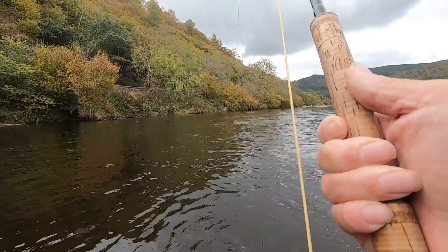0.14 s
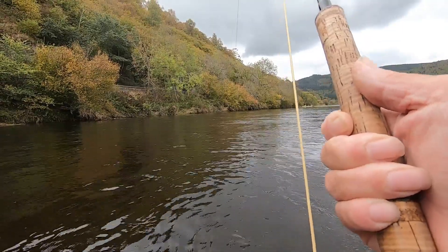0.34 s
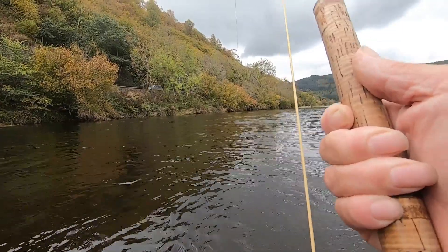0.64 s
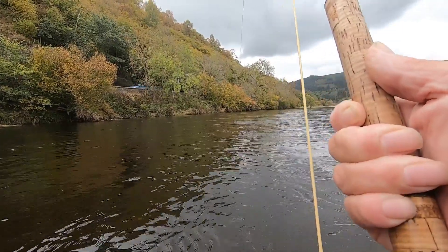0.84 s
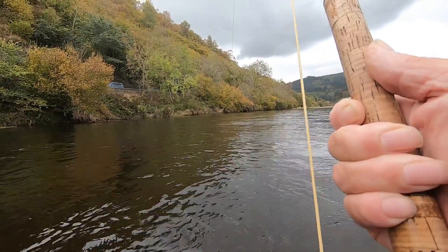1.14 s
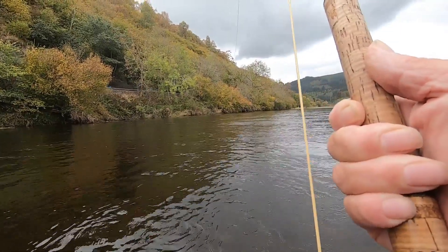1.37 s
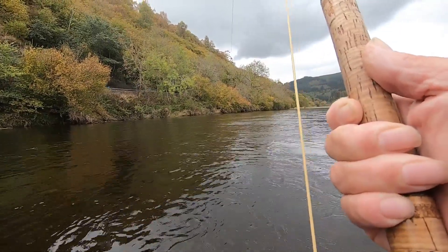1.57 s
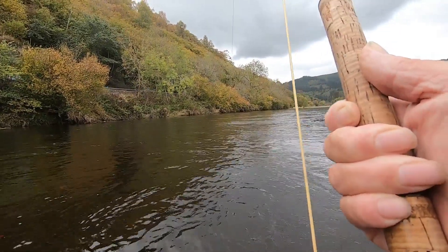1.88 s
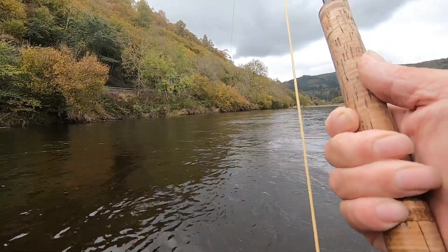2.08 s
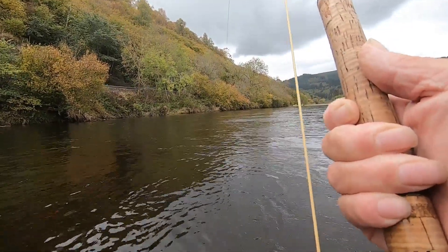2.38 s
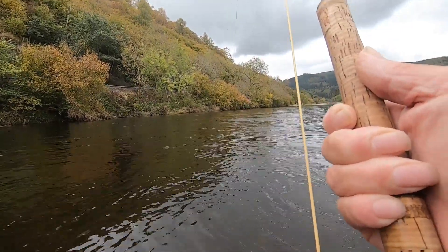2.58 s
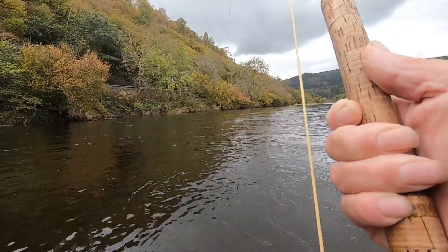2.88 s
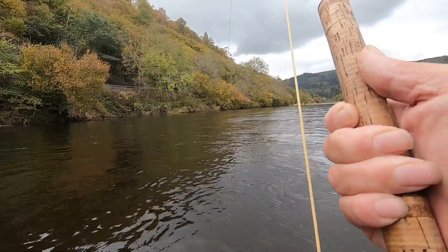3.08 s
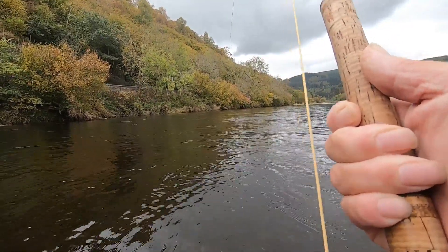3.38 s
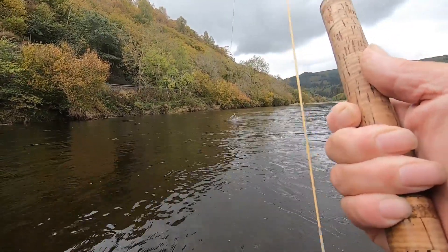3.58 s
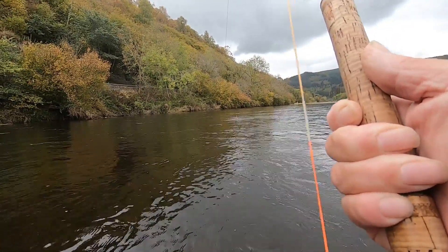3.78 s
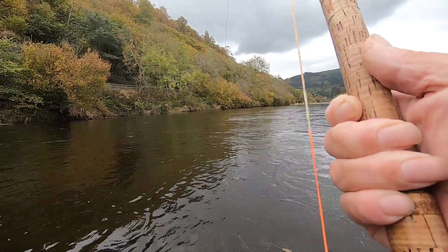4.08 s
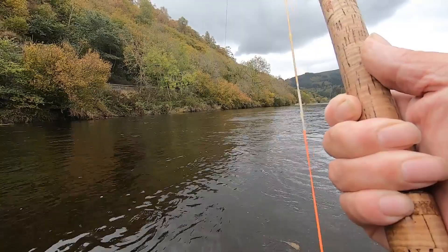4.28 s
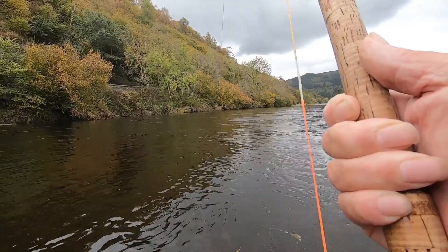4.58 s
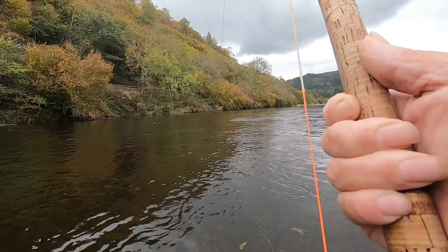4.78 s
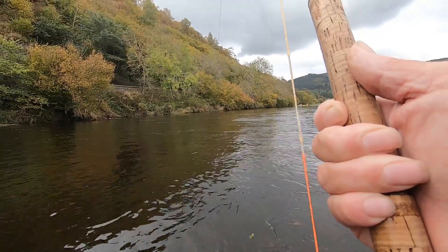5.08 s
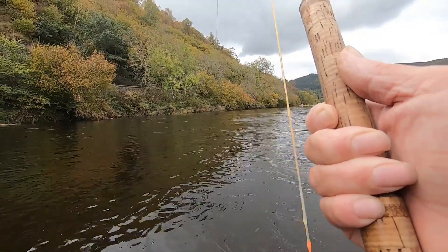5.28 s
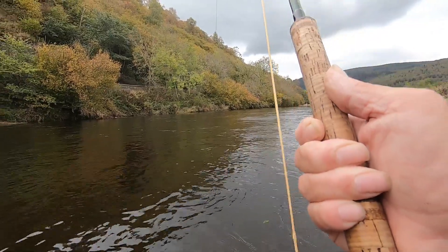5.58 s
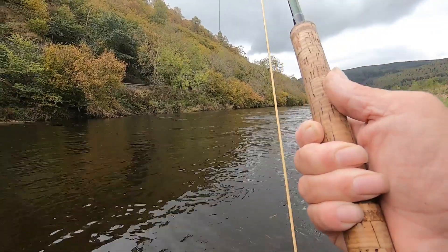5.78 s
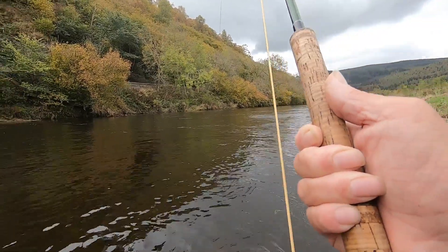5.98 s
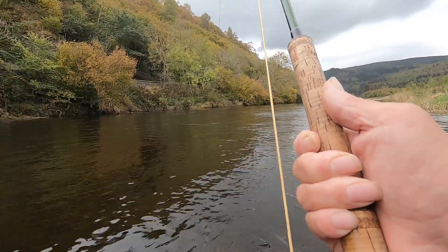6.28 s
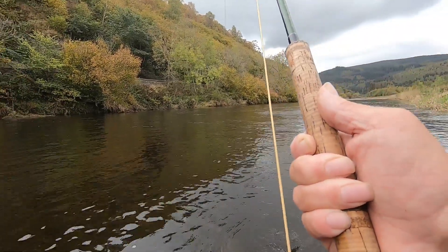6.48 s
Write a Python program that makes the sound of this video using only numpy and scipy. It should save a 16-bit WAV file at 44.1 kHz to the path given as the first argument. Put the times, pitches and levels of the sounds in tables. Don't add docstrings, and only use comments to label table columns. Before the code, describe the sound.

A wide, soft river hiss surrounds the listener, with a distant engine throbbing low over tyre drone, pulling unevenly until about 2 s, then fading. Just right of centre and very close, a fly reel clicks: hard, bright, dry metallic snaps with a tiny ring. A lone click at 0.1 s, a short burst of about ten from 0.2 to 0.5, then scattered single ticks to 1.5 and one near 2.0. Faster tugs rattle at 2.2-2.6 and 2.7-3.2, then a dash whirrs at 3.3-3.9, up to about 150 clicks a second, with a brief check near 3.5. Quiet water follows, with irregular slow ticks at 4.5-4.8 and faint slips. From 5.1 a long run ratchets on to the end at 6.6, surging and easing around 45-100 clicks a second, slightly changed in tone. The body-worn stereo microphone catches only a slight short echo.

```python
import sys
import numpy as np
from scipy import signal
from scipy.fft import rfft, irfft, next_fast_len
from scipy.io import wavfile
from scipy.ndimage import uniform_filter1d, minimum_filter1d, map_coordinates

SR = 44100
rng = np.random.default_rng(int(sys.argv[2]) if len(sys.argv) > 2 else 0)


def wav_out(sig):
    wavfile.write(sys.argv[1], SR, np.round(np.clip(np.atleast_2d(sig).T, -1, 1) * 32767).astype(np.int16))


def convert_level_to_amplitude(level_db):
    exponent = np.asarray(level_db, float) / 20
    return 10 ** exponent


N = 293044

# time_s, level_db
TRAFFIC = [(0, -37.5), (.9, -36.5), (1.25, -34), (1.6, -35.5), (2.2, -34.5), (2.7, -41), (3.3, -43),
           (4.8, -42.5), (6.64, -45.5)]
# start_s, length_s, level_db
ENGINE_PULLS = [
    (0.04, 0.47, -36),
    (.8, 0.11, -37.5),
    (1.214, 0.064, -38),
    (1.64, 0.25, -37),
]
# pitch_hz, density_db
ENGINE_SPECTRUM = [(15, -71), (28, -1), (40, 3), (55, 1), (75, 8.5), (110, -26), (180, -120)]
ROAD_SPECTRUM = [(20, -53), (60, -14), (100, -3.5), (156, -4), (253, -2), (350, -8.5), (700, -20),
                 (910, -29.5), (1540, -120)]
RIVER_SPECTRUM = [(150, -79), (240, -53), (400, -10), (650, -9), (1100, -3), (1310, -6.5), (2020, -14),
                  (2350, -19.5), (3000, -19.5), (4200, -32), (6000, -36), (9700, -46), (11400, -62),
                  (16000, -110)]
# time_s, level_db
RIFFLE = [(0, -1.5), (2.2, -2.5), (3.9, 8), (4.1, -9.5), (6.64, 14.5)]
# pitch_hz, difference_db
FAR_PAN = [(60, -0.4), (400, -1), (700, -3), (1300, 7), (2400, 1), (4400, 1.5), (8000, -3.5)]
# pitch_hz, share_0_to_1
PORT_LIKENESS = [(100, 0.97), (330, 0.97), (700, 0.78), (1400, 0.2), (3000, 0.12), (8000, .15)]
# pitch_hz, lead_rad
FAR_LEAD = [(100, 0), (450, 0.12), (950, 2), (2070, 3), (4000, 6.3), (8000, 11.5)]
REEL_LEAD = [(600, 0.5), (1400, 1.5), (2580, -5.9), (3300, 1.1), (5100, -1.87), (6500, -2), (8100, -1.88),
             (9300, -2), (10200, -3.5), (14000, -4.5)]

CREEPS = [0.0808, 0.6545, 0.9136, 0.954, 1.0383, 1.1031, 1.1618, 1.2184, 1.2742, 1.4957, 2.0179, 4.4606,
          4.5123, 4.5462, 4.5745, 4.6311, 4.738, 4.7964]
# time_s, speed_teeth_per_s
TUGS = [
    [(0.219, 24.98), (0.297, 40.54), (0.378, 19.98), (0.399, 32.05), (0.481, 27.59)],
    [(2.2311, 20.62), (2.268, 33.83), (2.371, 50.84), (2.401, 58.38), (2.426, 23.56), (2.467, 23.94),
     (2.519, 68.92), (2.566, 40.79)],
    [(2.7062, 27.05), (2.784, 64.31), (2.846, 63.69), (2.854, 56.73), (2.935, 24.96), (2.998, 28.17),
     (3.064, 57.82), (3.105, 52.76), (3.176, 58.2)],
]
DASH = [
    [(3.2743, 23.38), (3.318, 99.93), (3.346, 134.94), (3.37, 151.98), (3.392, 150.03), (3.422, 92.79),
     (3.462, 38.54)],
    [(3.4808, 60.31), (3.544, 133.83), (3.572, 140.81), (3.635, 126.88), (3.717, 152.89), (3.767, 138.06),
     (3.818, 89.51), (3.884, 74.08), (3.929, 42.88)],
]
RUN_START = [
    [(5.0795, 24.8), (5.13, 28.95), (5.168, 61.08), (5.197, 68.12), (5.233, 61.45), (5.292, 68.63),
     (5.328, 52.01), (5.364, 43.14)],
    [(5.3874, 43.58), (5.446, 59.74), (5.536, 47.23), (5.577, 48.11), (5.656, 64.25), (5.668, 57.67),
     (5.8, 69.0), (5.822, 80.78)],
]
RUN_ON = [
    [(5.8349, 75.94), (5.887, 80.92), (5.928, 86.41), (5.955, 64.72), (5.993, 55.24), (6.03, 67.34),
     (6.073, 102.92), (6.119, 71.4), (6.187, 52.43)],
    [(6.2063, 53.84), (6.306, 74.68), (6.325, 87.73), (6.34, 88.03), (6.431, 56.64), (6.505, 79.38),
     (6.554, 60.84), (6.613, 48.31), (6.642, 54.31)],
]
# time_s, rms_db
SLIPS = [(4.648, -47), (4.881, -47), (5.02, -51), (5.931, -32), (4.247, -64)]
# spread_hz, t60_s, left_db, right_db
ZONES = [
    (335, 0.014, -10.5, -1),
    (454, 0.01, -8.5, -1.5),
    (408, 0.0062, -7, 4.5),
]
# tooth, pitch_hz, level_db
FACES_FIRST_GRIP = [
    [(0, 3800, -14.5), (8, 3910, -12), (12.1, 3700, -15.5), (18, 3550, -11.5), (24.2, 3580, -16),
     (28, 3780, -16)],
    [(0, 5920, -3.5), (6, 5940, -3), (11, 6160, -6), (14.6, 5350, -1.5), (17.6, 5600, -5.5), (23, 5620, -7),
     (27, 6100, -4)],
    [(0, 7500, -8), (5, 7650, -4.5), (9.05, 7700, -2), (13, 7600, -6.5), (18, 7400, -4.5),
     (22.5, 7960, -2.5), (26, 5880, 0.5)],
]
FACES_SECOND_GRIP = [
    [(0, 3600, -13), (5, 2660, -27), (10.4, 3600, -9), (17.3, 3350, -12.5), (19.5, 3380, -18),
     (25.9, 3230, -22.5), (29, 3630, -16)],
    [(0, 5900, -2), (4.02, 5300, -13.5), (9.1, 5800, -5.5), (14.1, 6100, -10.5), (15.8, 5980, -12.5),
     (20.4, 5650, -8.5), (27.2, 5100, -11.5)],
    [(0, 7500, 1.5), (4.96, 7050, -1), (9, 7180, -9), (11.1, 7300, 0), (14.9, 8000, -2), (20, 6400, -7),
     (25.2, 7430, -0.5)],
]
STEADY_HZ = [3985, 6070, 7740]
STEADY_GAIN_DB = [3, 2, -8]
# pitch_hz, t60_s, left_db, right_db
FRAME_MODES = [(945, 0.032, -49.5, -29.5), (2070, 0.024, -62, -30), (5020, 0.012, -25, -19),
               (9460, 0.0078, -18.5, -33), (10170, 0.0074, -17.5, -16), (5940, 0.14, -67, -44),
               (2580, 0.012, -37, -27)]
# time_s, pitch_hz, level_db
FOOT_HUM = [(0, 1335, 5), (4.0, 1350, 6.5), (5.1, 1402, 3.5), (6.64, 1400, 1)]
# pitch_hz, level_db
CRACK_SPECTRUM = [(600, -54), (1500, -9.5), (3000, -3), (3800, -4), (4500, -4), (5600, -9.5), (7500, 0),
                  (8600, -4.5), (10300, -11), (11300, -17.5), (14000, -24), (15500, -32.5), (17000, -75)]
# pitch_hz, t60_s
BANK_DECAY = [(1000, 0.1), (5000, 0.31), (14000, 0.12)]

HISS_DB, HISS_FADE_DB_PER_S = -43, 0.9752
HISS_FOLLOWS = 0.17
PULL_RISE_S, PULL_FALL_DB_PER_S = 0.055, 64
IDLE_DB, IDLE_FADE_DB_PER_S, IDLE_SWING_DB = -41.5, 1.2, 2.5
TEETH = 30
SNAP_DB, SNAP_SCATTER_DB = -20.5, 0.35
FAST_LOSS_DB = 0.5
REGRIP_S, REGRIP_LOSS_DB = 4.95, 0.5
STEADY_SPEED = 223
DUCK_HZ, DUCK_UNDER_DB, DUCK_DEPTH_DB, DUCK_REACH_S = 4000, 32, -12, 0.022


def unit(x):
    return x / np.sqrt(np.mean(x ** 2) + 1e-20)


def along(points, hz):
    f, v = np.transpose(points)
    return np.interp(np.log(hz + 1), np.log(f + 1), v)


def curves(rows, times):
    s, *columns = np.transpose(rows)
    return [np.interp(times, s, column) for column in columns]


def wobble(rate):
    knots = rng.standard_normal(int(N * rate / SR) + 4)
    return map_coordinates(knots, [np.arange(N) * rate / SR])


def filtered(x, response):
    m = next_fast_len(x.shape[-1] + 4096)
    spectrum = rfft(x, m) * response(np.fft.rfftfreq(m, 1 / SR))
    return irfft(spectrum, m)[..., :x.shape[-1]]


def rush(spectrum, patchy_db, channels):
    z = signal.stft(rng.standard_normal((channels, N + 512)), nperseg=512)[2]
    field = uniform_filter1d(rng.standard_normal(z.shape[1:]), size=6, axis=0)
    field = uniform_filter1d(field, size=12, axis=1)
    noise = signal.istft(z * convert_level_to_amplitude(patchy_db * unit(field)), nperseg=512)[1][:, :N]
    return unit(filtered(noise, lambda hz: convert_level_to_amplitude(along(spectrum, hz))))


def outdoors():
    clock = np.arange(N) / SR
    road_db, = curves(TRAFFIC, clock)
    river_db = HISS_DB - HISS_FADE_DB_PER_S * clock + HISS_FOLLOWS * (road_db - road_db[0])
    throb = throb_gain(clock) * engine()
    road = convert_level_to_amplitude(road_db + 0.5 + 1.13 * wobble(3.095)) * rush(ROAD_SPECTRUM, patchy_db=0.7, channels=2)
    river = rush(RIVER_SPECTRUM, patchy_db=1.13, channels=2)
    top = filtered(river, lambda hz: np.clip(hz / 4000 - 0.45, 0, 1))
    river += (convert_level_to_amplitude(curves(RIFFLE, clock)[0]) - 1) * top
    river *= convert_level_to_amplitude(river_db + 7.0 + 0.72 * wobble(2.46))
    return ports(throb + road + river)


def engine():
    note = np.sin(2 * np.pi * np.cumsum(53.5 + 2.51 * wobble(5.9)) / SR)
    rumble = rush(ENGINE_SPECTRUM, patchy_db=-3.0, channels=2)
    return unit(note * convert_level_to_amplitude(1.9 * wobble(19)) + 0.85 * rumble)


def throb_gain(clock):
    gain = convert_level_to_amplitude(IDLE_DB - IDLE_FADE_DB_PER_S * clock + IDLE_SWING_DB * wobble(4.16))
    for s, length, db in ENGINE_PULLS:
        rise = np.clip((clock - s) / PULL_RISE_S + 1, 0, 1)
        fall_db = PULL_FALL_DB_PER_S * np.maximum(clock - s - length, 0)
        gain = np.maximum(gain, rise * convert_level_to_amplitude(db - fall_db))
    return gain


def ports(pair):
    alike = lambda hz: along(PORT_LIKENESS, hz)
    shared = filtered(pair[0], lambda hz: alike(hz) * np.exp(-1j * along(FAR_LEAD, hz)))
    right = shared + filtered(pair[1], lambda hz: np.sqrt(1 - alike(hz) ** 2))
    return filtered(np.array([pair[0], right]), lambda hz: convert_level_to_amplitude(along(FAR_PAN, hz) * [[0.5], [-0.5]]))


def reel():
    s, db, tooth = blows()
    t = np.arange(-200, 1200) / SR
    loose = np.clip(np.gradient(s) * 18 - 0.07, 0.06, 0.22)
    snaps = np.zeros((2, len(s), len(t)))
    for (hz, zone_db), (spread, t60, left_db, right_db) in zip(faces(s, tooth), ZONES):
        for side in (-1, 0, 1):
            pitch = hz + spread * (side + loose * tooth_chance(len(s), 0.35))
            mode_db = zone_db - (9 - 14 * loose) * abs(side)
            snaps += ring(t, pitch, mode_db, t60, left_db, right_db, scatter_db=8 * loose, slur=0.4)
    for hz, t60, left_db, right_db in FRAME_MODES:
        pitch = hz * (1 + 0.011 * tooth_chance(len(s), 0.7))
        snaps += ring(t, pitch, 0, t60, left_db, right_db, scatter_db=-4.0, slur=0.21)
    seated = 0.17 + 0.54 * np.exp(-(t / 0.0091) ** 4)
    snaps += seated * ring(t, *curves(FOOT_HUM, s), 0.018, -30, -16.5, scatter_db=-0.34, slur=0.73)
    snaps = snaps * landing(t, 0.00095) + crack(len(s), t)
    snaps *= np.clip(np.minimum((t[-1] - t) / 0.008, (t - t[0]) / 0.002), 0, 1)
    size = np.sqrt(np.mean(snaps[..., 200:360] ** 2, axis=(0, 2)))
    snaps *= (convert_level_to_amplitude(db + 0.06) / size)[:, None]
    first = np.round((s - 0.0004 + t[0]) * SR).astype(int)
    at = first[:, None] + np.arange(len(t))
    return np.array([np.bincount(at.ravel(), ear.ravel(), N + SR)[:N] for ear in snaps])


def blows():
    s = teeth_times()
    db = SNAP_DB - FAST_LOSS_DB / np.gradient(s) / 100 - REGRIP_LOSS_DB * (s > REGRIP_S)
    db = db + SNAP_SCATTER_DB * tooth_chance(len(s), 0.56)
    slip_s, slip_db = np.transpose(SLIPS)
    tooth = np.r_[np.arange(len(s)), np.searchsorted(s, slip_s)]
    rows = np.array([np.r_[s, slip_s], np.r_[db, slip_db], tooth])
    return rows[:, np.argsort(rows[0])]


def teeth_times():
    times = list(CREEPS)
    for speed in TUGS + DASH + RUN_START + RUN_ON:
        begin, end = speed[0][0], speed[-1][0]
        clock = np.arange(begin, end + 0.02, 1e-4)
        turned = np.cumsum(curves(speed, clock)[0]) * 1e-4
        count = round(np.interp(end, clock, turned)) + 1
        times += list(np.interp(np.arange(count), turned - turned[0], clock))
    return np.sort(times)


def tooth_chance(count, memory):
    draws = rng.standard_normal((count, 2))
    shared = unit(uniform_filter1d(draws[:, 0], size=5))
    return np.sqrt(memory) * shared + np.sqrt(1 - memory) * draws[:, 1]


def faces(s, tooth):
    def read(zone):
        angle, hz, db = np.transpose(zone)
        return [np.interp(tooth, angle, column, period=TEETH) for column in (hz, db)]

    swing = np.clip(1 - 1 / np.gradient(s) / STEADY_SPEED, 0, 1)
    result = []
    for first, second, fast_hz, fast_db in zip(FACES_FIRST_GRIP, FACES_SECOND_GRIP, STEADY_HZ, STEADY_GAIN_DB):
        hz, db = np.where(s < REGRIP_S, read(first), read(second))
        result.append((fast_hz + swing * (hz - fast_hz), db + (1 - swing) * fast_db))
    return result


def ring(t, hz, db, t60, left_db, right_db, scatter_db, slur):
    n = len(hz)
    lead = along(REEL_LEAD, hz) + 0.67 * tooth_chance(n, 0.21)
    phase = rng.uniform(0, 2 * np.pi) + slur * tooth_chance(n, 0.83) + np.array([[1], [0]]) * lead
    gain = convert_level_to_amplitude(db + scatter_db * tooth_chance(n, 0.78) + np.array([[left_db], [right_db]]))
    wave = np.sin(2 * np.pi * hz[:, None] * t + phase[..., None])
    return gain[..., None] * convert_level_to_amplitude(-60 * t / t60) * wave


def landing(t, rise):
    return 1 - np.exp(-(np.maximum(t, 0) / rise) ** 2)


def crack(count, t):
    shared, own = rng.standard_normal((count, 2, len(t))).transpose(1, 0, 2)
    treble = lambda hz: np.clip(hz / 5000 - 1.6, 0, 1)
    far = 0.17 * filtered(shared, lambda hz: np.exp(1j * along(REEL_LEAD, hz))) + 0.69 * own
    far = filtered(far, lambda hz: convert_level_to_amplitude(7.7 * treble(hz)))
    sharp_db = 3.5 * tooth_chance(count, 0.3)[:, None]
    colour = lambda hz: convert_level_to_amplitude(along(CRACK_SPECTRUM, hz) + sharp_db * treble(hz))
    noise = unit(filtered(np.array([far, shared]), colour))
    blow = landing(t, 0.0012) * convert_level_to_amplitude(-60 * t / 0.016)
    swell = convert_level_to_amplitude(-29 - 60 * abs(t) / 0.02)
    return convert_level_to_amplitude(np.array([-18.5, -13.5]))[:, None, None] * noise * (blow + swell)


def bank(x):
    hz, t, z = signal.stft(rng.standard_normal((2, SR // 4)), SR, nperseg=256)
    decay = convert_level_to_amplitude(-60 * t / along(BANK_DECAY, hz)[:, None])
    tail = signal.istft(z * decay, SR, nperseg=256)[1]
    return signal.fftconvolve(x.sum(0)[None], tail / np.linalg.norm(tail[0]), axes=1)[:, :N]


def scene():
    clicks = reel()
    return outdoors() + clicks + convert_level_to_amplitude(-33) * bank(clicks)


def ducked(x):
    top = filtered(x, lambda hz: np.clip(hz / DUCK_HZ * 2 - 1, 0, 1))
    level = np.sqrt(abs(uniform_filter1d(np.mean(top ** 2, 0), size=120)) + 1e-14)
    near = -minimum_filter1d(-level, size=round(2 * DUCK_REACH_S * SR))
    gain = np.clip((level / near * convert_level_to_amplitude(DUCK_UNDER_DB)) ** 2, convert_level_to_amplitude(DUCK_DEPTH_DB), 1)
    return x + (uniform_filter1d(gain, size=60) - 1) * top


def low_pass(x):
    return signal.sosfilt(signal.butter(12, 16820, fs=SR, output="sos"), x)


def record(dry):
    mix = ducked(dry)
    return low_pass(mix)


dry = scene()
out = record(dry)
wav_out(out)
```